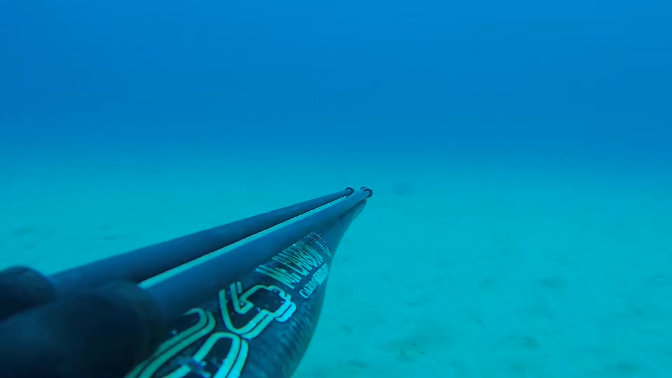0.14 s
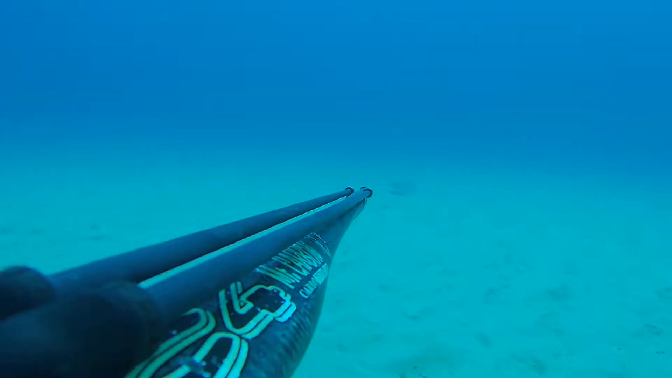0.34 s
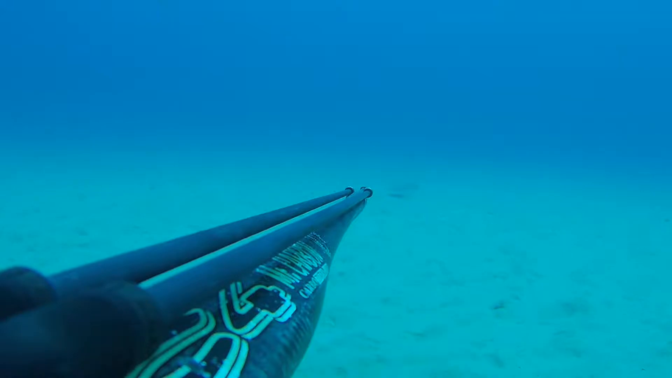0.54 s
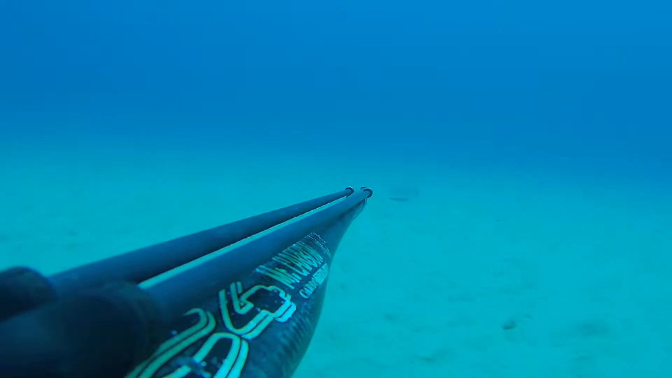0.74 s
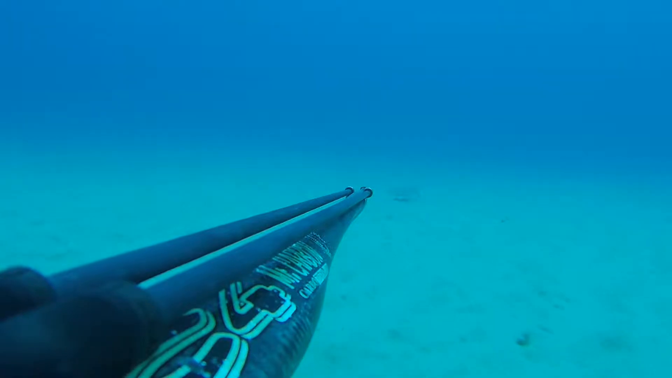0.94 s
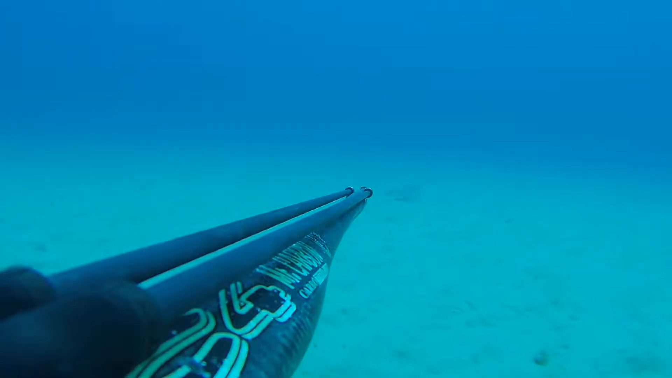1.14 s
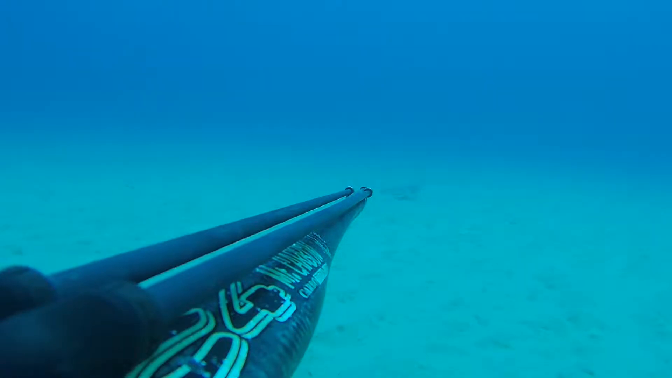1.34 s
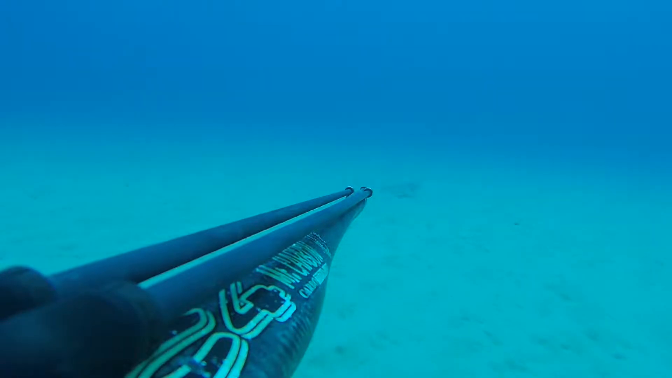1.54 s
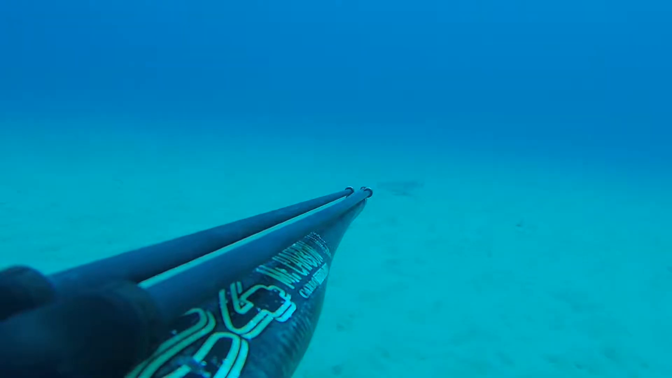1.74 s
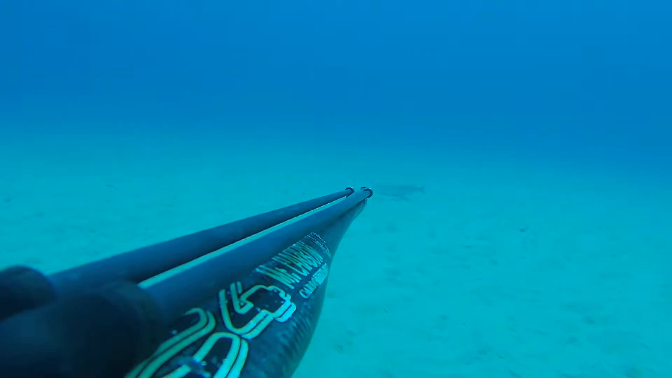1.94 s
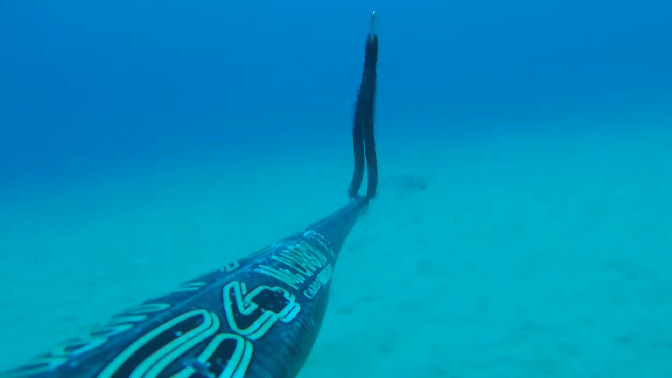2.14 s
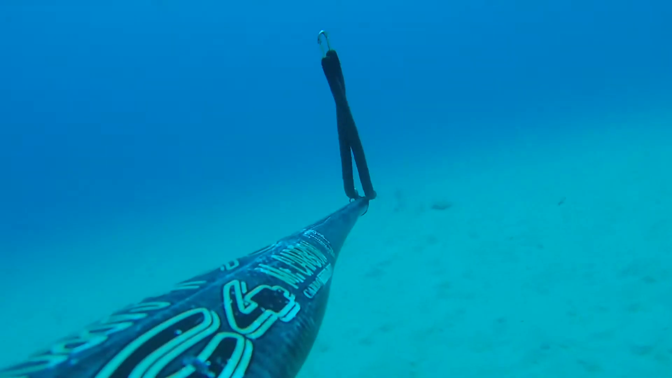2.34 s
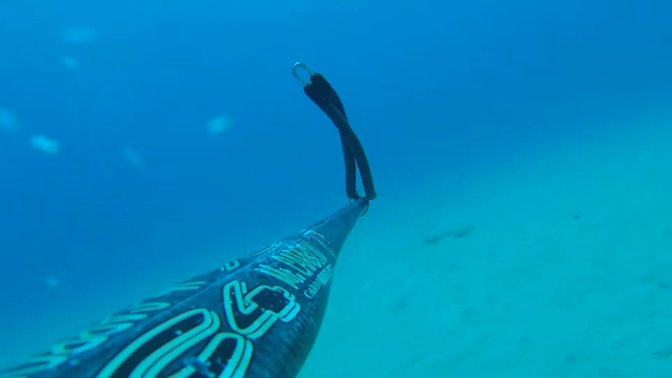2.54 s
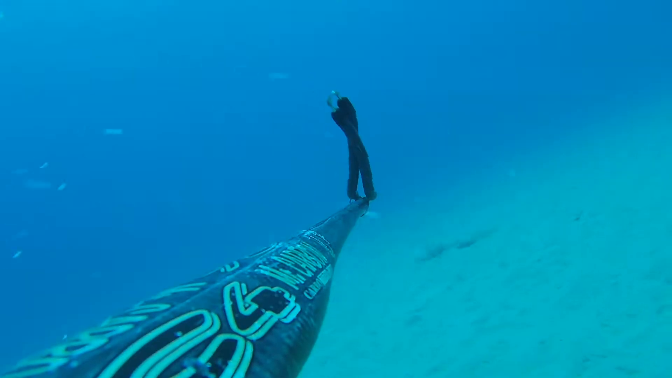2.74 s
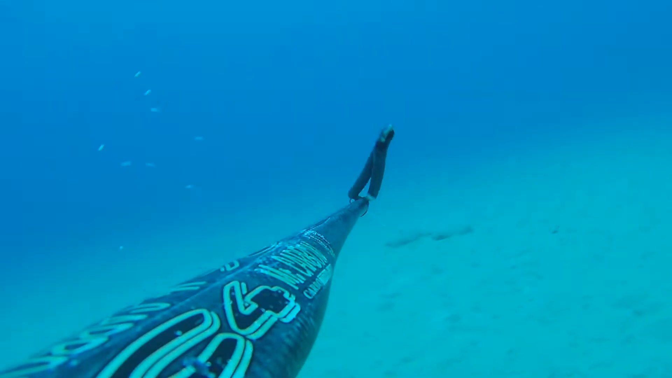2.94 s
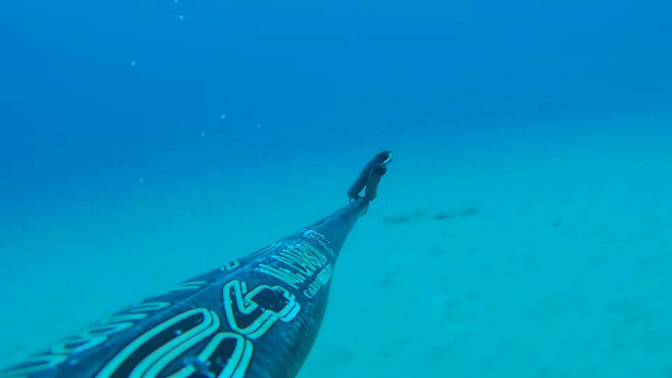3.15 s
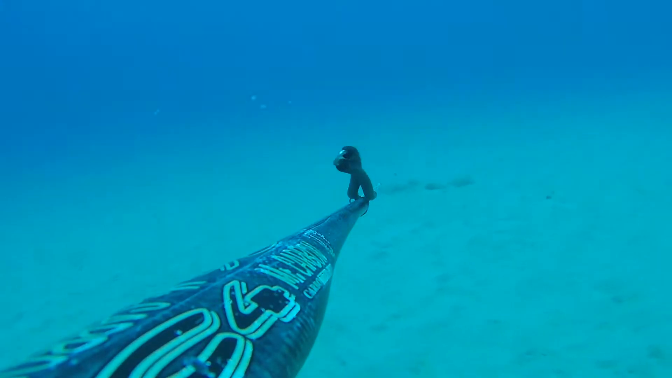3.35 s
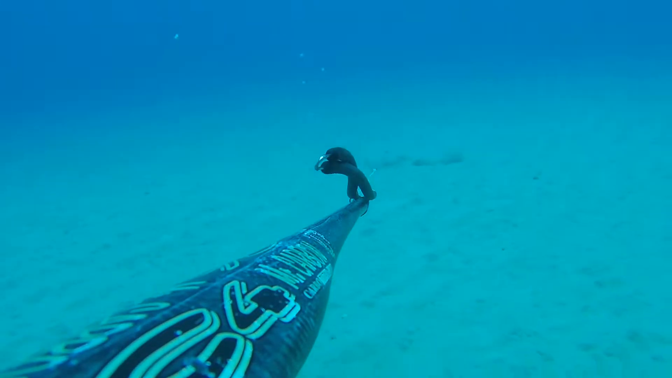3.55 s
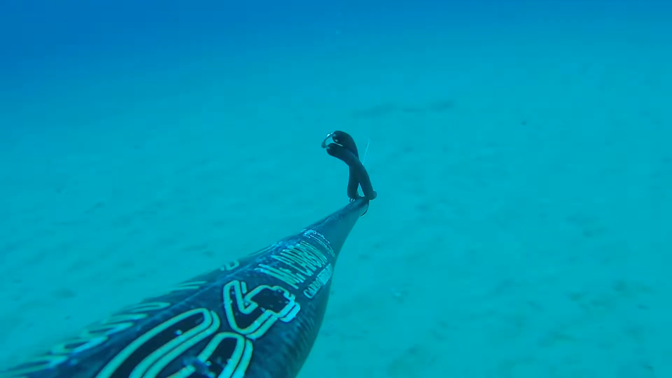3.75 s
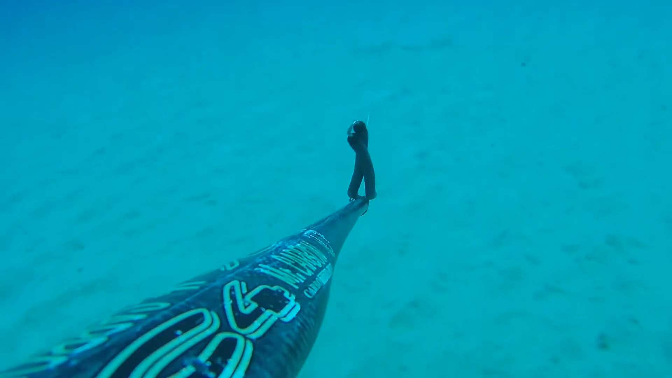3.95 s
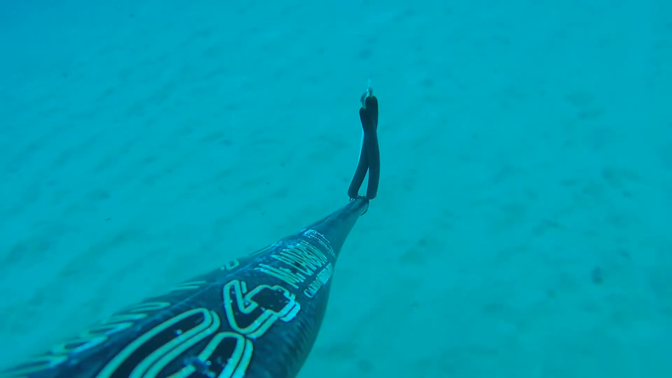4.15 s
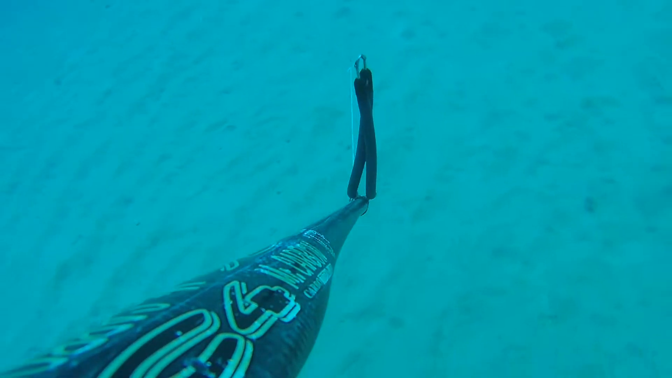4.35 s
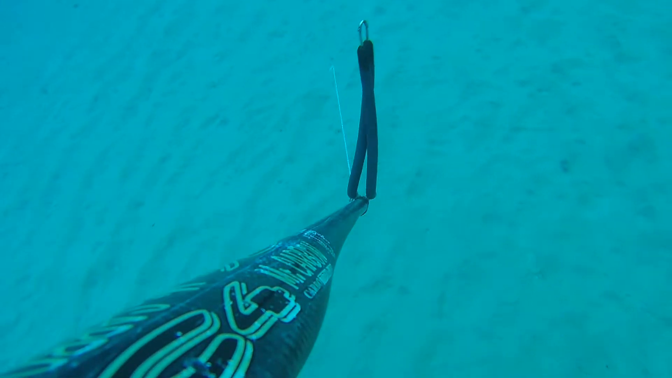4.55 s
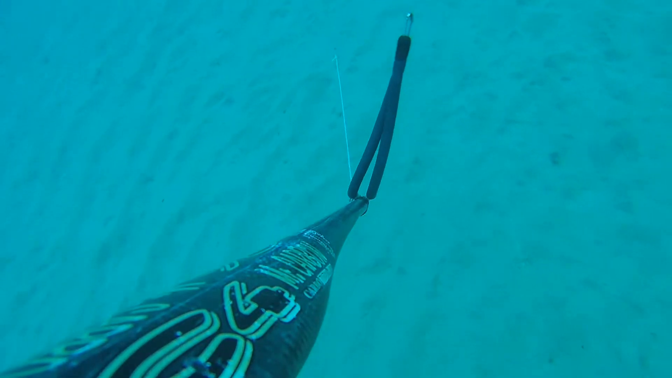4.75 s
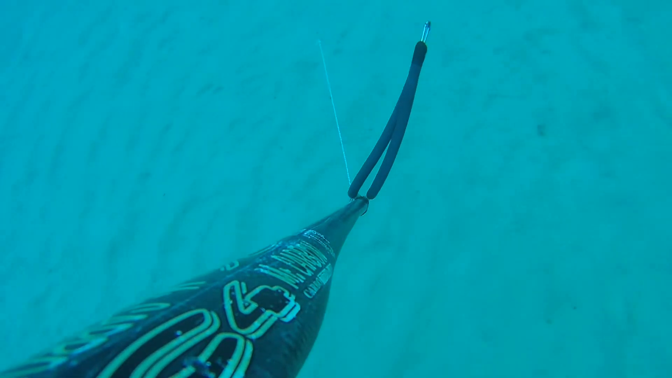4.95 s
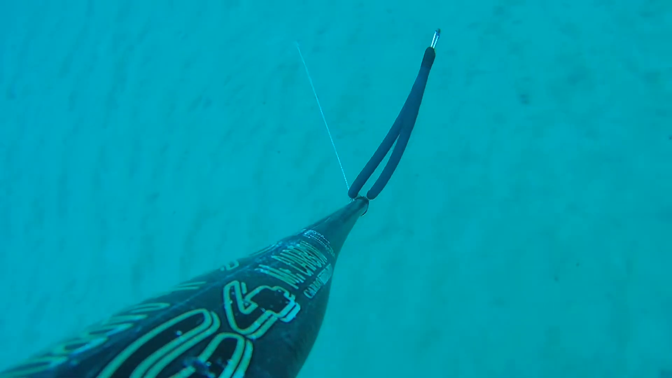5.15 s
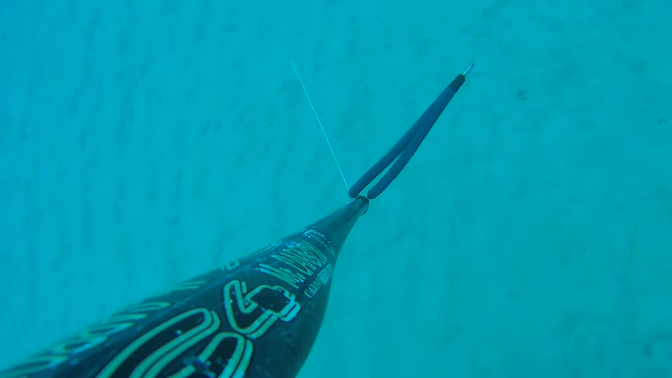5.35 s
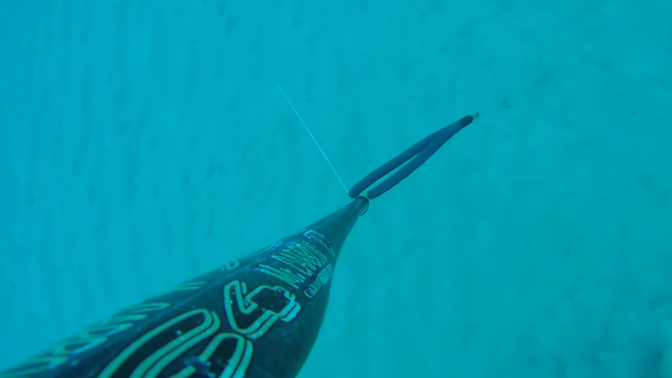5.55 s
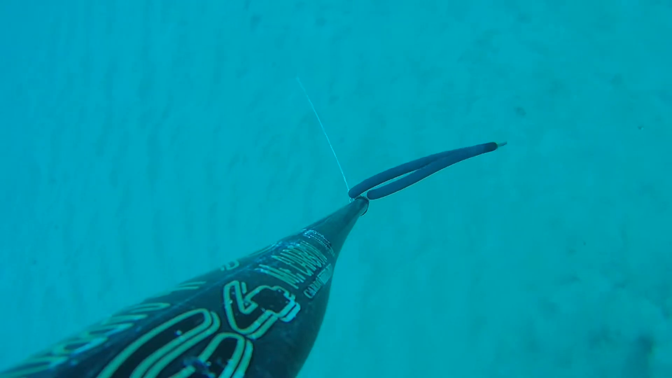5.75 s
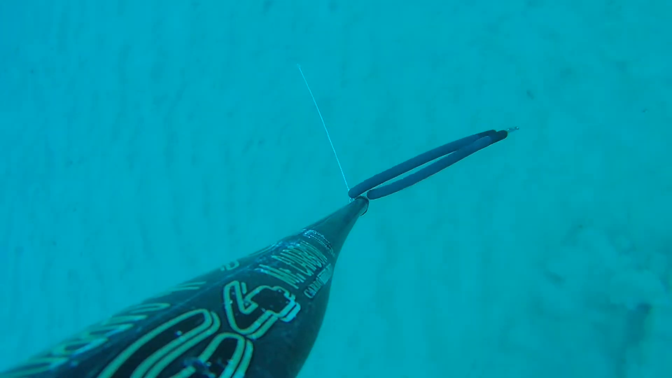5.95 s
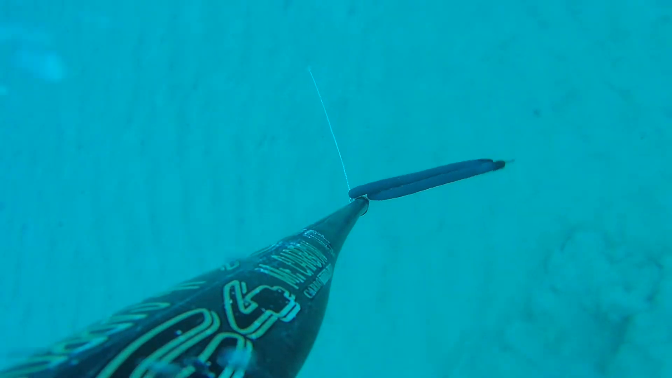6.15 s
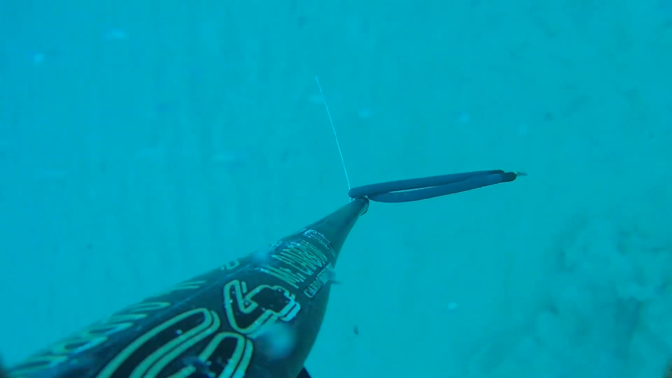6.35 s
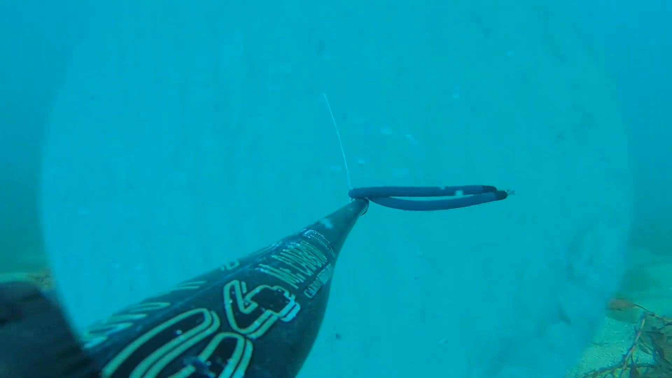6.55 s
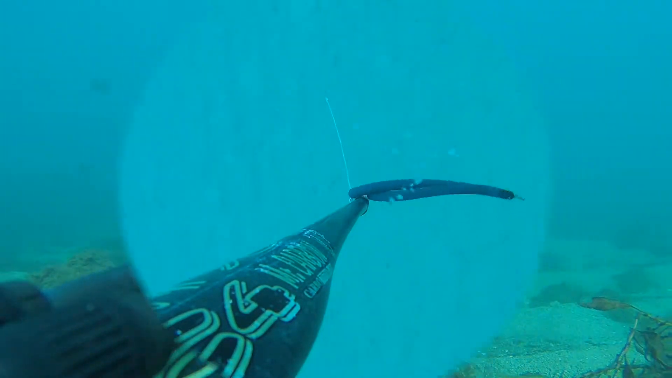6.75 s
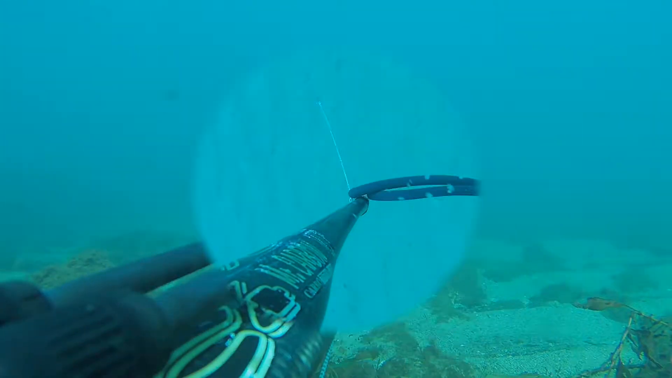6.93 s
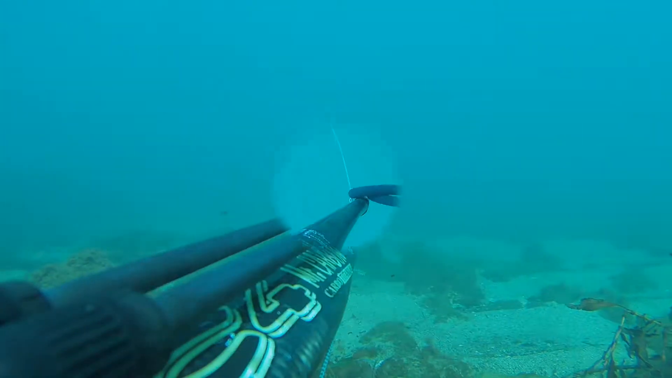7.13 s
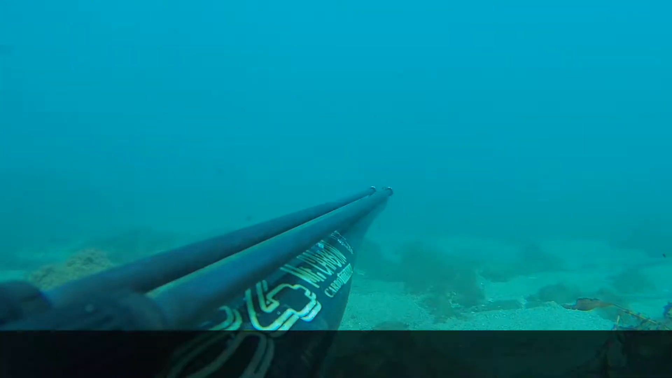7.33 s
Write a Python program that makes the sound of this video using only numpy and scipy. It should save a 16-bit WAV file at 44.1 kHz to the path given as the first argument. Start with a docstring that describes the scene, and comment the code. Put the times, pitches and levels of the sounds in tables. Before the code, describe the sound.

Beneath the sea, faint crackle and deep rumble are split by one distorted speargun blast; afterwards come slack rubber judders, water pushes, soft knocks and a bubble plop.

```python
"""Water rumbles past a housing fixed to an underwater rubber-band speargun; snapping shrimp crackle.
At 1.93 s it fires: decaying barrel modes, coloured-noise scrape, heave and whip, slap and clink bursts.
The recoil overloads the input and the gain ducks. Slack rubber then judders as wandering resonances;
bubbles ring, friction noise sings in the line, glided sines thrum, and one big bubble drops in pitch.
Flow and pushes of water shape coloured noise and gurgling bubble clouds."""
import sys
import numpy as np
from scipy import signal
from scipy.fft import rfft, irfft
from scipy.io import wavfile
from scipy.ndimage import uniform_filter1d, minimum_filter1d

SR = 44100
rng = np.random.default_rng(int(sys.argv[2]) if len(sys.argv) > 2 else 0)


def store_pcm(level_fs):
    """Save levels as 16-bit WAV."""
    pcm = np.round(np.clip(level_fs, -1, 1) * 32767).astype(np.int16)
    wavfile.write(sys.argv[1], SR, np.atleast_2d(pcm).T)


N = 325899
TIME = np.arange(N) / SR


def from_db(db):
    """Decibels to amplitude gain."""
    return 10 ** (np.asarray(db) / 20)


def rms_one(x):
    """Scale to unit power."""
    return x / np.sqrt(np.mean(x ** 2) + 1e-20)


def curve(rows):
    """Table points joined by straight lines in time."""
    return np.interp(TIME, *np.transpose(rows))


def swell(rows):
    """Gain from a dB curve, silent outside its span."""
    inside = (TIME >= rows[0][0]) & (TIME <= rows[-1][0])
    return from_db(curve(rows)) * uniform_filter1d(inside * 1., size=400)


def coloured(x, spectrum):
    """Minimum-phase filter of the given spectrum, sloping off beyond its ends; unit power gain."""
    size = 16384
    hz, db = np.transpose(spectrum)
    hz = np.r_[hz[0] / 1.25, hz, hz[-1] * 1.25]
    db = np.r_[db[0] - 20, db, db[-1] - 21]
    log_hz = np.log(np.maximum(np.fft.rfftfreq(size, 1 / SR), 1))
    cepstrum = irfft(np.log(from_db(np.interp(log_hz, np.log(hz), db))))
    # fold the cepstrum: causal, minimum phase
    cepstrum[1:size // 2] *= 2
    cepstrum[size // 2 + 1:] = 0
    response = irfft(np.exp(rfft(cepstrum)))[:size // 2]
    return signal.fftconvolve(x, response / np.linalg.norm(response))[:N]


def noise(spectrum):
    """Coloured noise of unit power."""
    return rms_one(coloured(rng.standard_normal(N), spectrum))


def evened(x, span_s):
    """Take out level swings slower than the span."""
    power = np.abs(uniform_filter1d(x ** 2, size=max(int(span_s * SR), 2)))
    return x / np.sqrt(power + 1e-9)


def drift(rate_hz):
    """Low-passed chance of unit rms."""
    lowpass = signal.butter(2, rate_hz, fs=SR, output="sos")
    return rms_one(signal.sosfilt(lowpass, rng.standard_normal(N)))


def phase_of(hz):
    """Running phase of a moving frequency."""
    return 2 * np.pi * np.cumsum(hz) / SR


def singing(hz, width_hz):
    """A moving resonance kept going by friction: narrow-band noise about hz."""
    phase = phase_of(hz)
    return rms_one(drift(width_hz / 2) * np.cos(phase) + drift(width_hz / 2) * np.sin(phase))


def clicks(times_s, sizes):
    """One impulse per event."""
    out = np.zeros(N)
    out[(np.asarray(times_s) * SR).astype(int)] = sizes
    return out + 1e-18


def fading(x, t60_s):
    """Each impulse starts an exponential decay."""
    return signal.lfilter([1], [1, -from_db(-60 / (t60_s * SR))], x)


def ring(x, hz, t60_s):
    """Two-pole resonator: a unit impulse starts a decaying sine of height 1."""
    r, w = from_db(-60 / (t60_s * SR)), 2 * np.pi * hz / SR
    return signal.lfilter([0, r * np.sin(w)], [1, -2 * r * np.cos(w), r * r], x)


def bursts(x, t60_s, tail_db, tail_t60_s):
    """Each impulse becomes a short noise crack with a fainter scattered tail."""
    envelope = fading(x, t60_s) + from_db(tail_db) * fading(x, tail_t60_s)
    return rng.choice([-1, 1], N) * envelope


def stroke(start_s, length_s, level_db, attack_s, release_s, slope_db_per_s=0):
    """Gain of one gesture: attack, level or sloping hold, release; attack and release in s per 20 dB."""
    since = TIME - start_s
    outside = np.maximum(-since, 0) / attack_s + np.maximum(since - length_s, 0) / release_s
    hold_db = level_db + slope_db_per_s * np.clip(since, 0, length_s)
    return from_db(hold_db - 20 * np.minimum(outside, 10))


def strokes(rows, attack_s, release_s, slope_db_per_s=0):
    """Strongest of several gestures of one shape; rows begin with start, length, level."""
    return np.max([stroke(*row[:3], attack_s, release_s, slope_db_per_s) for row in rows], axis=0)


def pitch_of(rows):
    """Pitch glides from mid-gesture to mid-gesture."""
    return curve([(s + length / 2, hz) for s, length, _, hz in rows])


def bubble_cloud(low_hz, high_hz, per_s, cycles):
    """Bubbles born at random ring at one of 16 pitches, -60 dB after the given cycles; unit power."""
    born = (rng.random(N) < per_s / SR) * rng.standard_normal(N)
    pitches_hz = np.geomspace(low_hz, high_hz, 16)
    dealt = rng.integers(0, len(pitches_hz), N)
    return rms_one(sum(ring(born * (dealt == k) + 1e-18, hz, cycles / hz)
                       for k, hz in enumerate(pitches_hz)))


# slow eddies on the housing, two runs before and after the shot [t/s, relative level/dB]
EDDIES = [
    [(0.02, -48), (0.212, -34), (0.232, -42), (0.658, -35.5), (1.294, -38), (1.428, -32.5), (1.556, -40.5),
     (1.8, -35.5)],
    [(2.55, -50.5), (2.68, -39.5), (4.97, -41), (5.26, -34), (5.37, -40), (5.45, -32.5), (6.19, -37.5),
     (7.3, -55)],
]
# spectra of eddies, buffeting, lower and upper rush, steady floor [f/Hz, relative density/dB per Hz]
EDDY_COLOUR = [(8, -11.5), (13, 0), (25, -2), (40, -3.5), (50, -15.5), (65, -17.5), (85, -33), (120, -41),
               (200, -59)]
BUFFET_COLOUR = [(35, -23.5), (60, 12.5), (80, 12), (105, -8.5), (140, -30), (250, -32.5)]
RUSH_LOW_COLOUR = [(60, -4), (110, -3), (150, -2.5), (225, -0.5), (300, -14.5), (400, -23.5), (600, -35.5)]
RUSH_HIGH_COLOUR = [(280, -14), (420, -8.5), (570, 11), (700, -0.5), (900, -9), (1400, -10), (2500, -28.5),
                    (4500, -18)]
FLOOR_COLOUR = [(40, 15), (100, -9.5), (220, -8), (330, -15), (600, -19.5), (1200, -23.5), (4000, -32),
                (14000, -32)]
# flow along the gun as it is swung round [t/s, level/dB]
FLOW = [(2.85, -69), (3.75, -71), (4.03, -49), (4.29, -45.5), (4.73, -51), (5.32, -52.5), (5.48, -42.5),
        (5.72, -47.5), (5.89, -44), (6.08, -49.5), (6.21, -48), (6.43, -47), (7.2, -63.5), (7.3, -83)]
# single pushes of water past the gun
# [t/s, length/s, rush level/dB, upper rush level/dB, buffeting level/dB]
SWISHES = [(2.635, 0.14, -64, -67, -34.5), (2.822, 0.36, -64.5, -69, -52), (3.05, .07, -66, -61, -55),
           (3.38, 0.1, -57.5, -70, -41.5), (3.805, 0.042, -46.5, -52.5, -61),
           (4.078, 0.42, -54.5, -59, -58), (5.4, 0.013, -41, -70, -34.5), (5.767, 0.12, -43.5, -63, -34),
           (5.944, 0.026, -36.5, -64, -30), (6.068, 0.0066, -48, -51.5, -58),
           (6.152, .12, -36.5, -52.5, -32), (6.495, 0.023, -44, -58.5, -32)]


def water(upper_follows=0.83, buffet_follows=0.76, gurgle_db=-3):
    """Eddies press on the housing; flow and pushes add buffeting, fluttering rush and gurgles."""
    eddies = from_db(3.5 + curve(np.vstack(EDDIES))) * evened(noise(EDDY_COLOUR), span_s=0.16)
    flow = swell(FLOW)
    s, length_s, *levels_db = np.transpose(SWISHES)
    push, upper_push, buffet_push = [
        strokes(zip(s, length_s, db), attack_s=0.035, release_s=0.049) for db in levels_db]
    low = (flow + push) * evened(noise(RUSH_LOW_COLOUR), span_s=0.1)
    rush = from_db(-3.5) * noise(RUSH_HIGH_COLOUR) * from_db(1.7 * drift(33))
    gurgle = from_db(gurgle_db) * bubble_cloud(low_hz=314, high_hz=957, per_s=410, cycles=9.9)
    high = (from_db(-26.5) * flow ** upper_follows + upper_push) * (rush + gurgle)
    buffet_gain = from_db(-5) * flow ** buffet_follows + buffet_push
    buffet = buffet_gain * evened(noise(BUFFET_COLOUR), span_s=0.21)
    return eddies + buffet + low + high + from_db(-52.5) * noise(FLOOR_COLOUR)


# hiss of far shrimp, two runs before and after the shot [t/s, relative level/dB]
CRACKLE = [
    [(0.05, -58.5), (0.224, -57.5), (0.636, -57), (0.716, -56), (1.116, -55), (1.302, -57.5), (1.85, -55)],
    [(3.0, -55.5), (3.29, -52), (3.79, -55), (4.33, -53.5), (6.58, -55.5), (7.01, -59.5), (7.3, -60)],
]
# what the housing lets through [f/Hz, relative density/dB per Hz]
HOUSING = [(1500, -20), (2200, -17.5), (3000, -17.5), (4300, -25.5), (4750, -8.5), (5200, -1), (5750, 1),
           (6900, -8), (7700, -3), (8700, -2.5), (9600, -12.5), (10800, -32.5), (12500, -16),
           (14000, -20.5)]


def far_shrimp(per_s=260, spread_db=6.0, wash_db=-5.0, snaps_db=0.5, patchy_db=1.74):
    """Countless far snaps merge to a hiss; nearer ones are grains; the level drifts in flurries."""
    sizes = from_db(spread_db * np.minimum(rng.exponential(1, N), 3.6))
    impulses = sizes * (rng.random(N) < per_s / SR) + 1e-18
    snaps = bursts(impulses, t60_s=0.0056, tail_db=-10, tail_t60_s=0.043)
    sea = from_db(wash_db) * rng.standard_normal(N) + from_db(snaps_db) * rms_one(snaps)
    level_db = curve(np.vstack(CRACKLE)) + patchy_db * drift(12.2)
    return from_db(level_db) * coloured(sea, HOUSING)


# near shrimp [t/s, relative strength/dB, low ring re strength/dB, top ring re strength/dB]
SNAPS = [(0.093, -38.5, -10.5, 4.5), (0.2074, -41, -13, 7), (0.3105, -45.5, -3.5, 10.5),
         (0.3901, -37, -14, 1), (0.4923, -39.5, -22, -16), (0.6266, -42, -27, -7), (0.774, -43, -22, 12),
         (0.906, -43, -30, -15), (1.0392, -41, -11, -16), (1.2238, -32, -29, -20), (1.296, -41, -28, -2),
         (1.4304, -38, -11.5, 2.5), (1.6093, -43, -6.5, 6), (1.6576, -50.5, -13, 18.5),
         (1.7786, -41, -30, 1), (3.0285, -49.5, -18, 15.5), (3.1095, -46, -15, 11.5),
         (3.4168, -32, -16, -9), (3.4381, -45, -17, -12), (3.5252, -42, -14, -4), (3.5764, -49.5, -22, 6),
         (3.7379, -36, -27, -3), (4.0183, -33, -22, -4), (4.128, -55.5, 3, 15), (4.5503, -38.5, -29, 7),
         (4.7791, -45.5, -4, -18), (5.1941, -51, 6, 21), (5.3028, -34, -24, -24), (5.464, -55, 2, 13),
         (6.0654, -42.5, 7, -4), (6.2398, -52.5, -14, 21.5), (6.277, -34, -28, 2.5),
         (6.4507, -29.5, -30, -13), (6.518, -49, 1, -13), (6.7, -51, 1.5, -11), (7.3107, -51.5, 3, 8)]
# housing bands; the first two take the low ring, the last the top ring [low f/Hz, high f/Hz, relative gain/dB]
SNAP_BANDS = [(1820, 2540, 3.5), (3750, 6700, 8.5), (5090, 5700, 6), (7100, 9000, 0)]


def near_shrimp():
    """Single snaps ring the housing bands, each in its own balance of low and top."""
    s, strength_db, low_db, top_db = np.transpose(SNAPS)
    out = 0
    shares_db = (low_db - 1, low_db - 1, 0, top_db)
    for share_db, (low_hz, high_hz, gain_db) in zip(shares_db, SNAP_BANDS):
        impulses = clicks(s, from_db(strength_db + share_db + gain_db - 5.5))
        crack = bursts(impulses, t60_s=0.0081, tail_db=-15, tail_t60_s=0.073)
        band = signal.butter(2, [low_hz, high_hz], "band", fs=SR, output="sos")
        out = out + signal.sosfilt(band, crack) * np.sqrt(SR / 2 / abs(high_hz - low_hz))
    return out


# bands and line striking the barrel [t/s, relative strength/dB, hardness/dB per octave]
KNOCKS = [(1.932, 3.5, -1), (1.946, 12.5, 2.5), (1.971, 13, 10.5), (1.986, 10.5, -3), (2.075, 8.5, 7),
          (2.084, 1.5, 6.5), (2.11, -23, 14), (2.13, -6, 0), (2.166, -5.5, 1), (2.18, -19, 12.5),
          (2.189, -3.5, -0.5), (2.208, -15.5, -2), (2.275, -5, 0), (2.283, -15.5, 4.5), (3.398, -45.5, 8),
          (3.801, -47, -1), (5.392, -24.5, 4.5), (5.4, -27, 4), (5.75, -28.5, 1.5), (5.812, -40, 3.5),
          (5.826, -26, 2.5), (5.839, -31.5, -9), (5.934, -29.5, 2), (5.968, -36, 8.5), (6.066, -41, 3),
          (6.12, -23.5, -5.5), (6.163, -23.5, -3), (6.243, -27.5, -4), (6.478, -33, 3),
          (6.513, -26.5, -8.5), (6.529, -25, -2.5), (6.641, -34, -1)]
# barrel modes in water [f/Hz, relative level/dB, t60/s]
BARREL = [(56, 1, 0.13), (142.4, -5, 0.094), (195.2, -1.5, 0.08), (227, -8.5, 0.053), (300, -15, 0.042),
          (374, -18.5, 0.041), (444, -35, 0.024), (490, -19.5, 0.065), (685, -34, 0.031),
          (940, -33.5, 0.016), (1180, -30, 0.0065), (1700, -31.5, 0.0055), (2400, -37.5, 0.0044)]


def knocks(contact_hz=900, pivot_hz=200):
    """Each blow rings the water-damped barrel; harder ones favour upper modes; contact low-passes all."""
    s, level_db, hardness = np.transpose(KNOCKS)
    chance_db = rng.normal(0, 3.47, (len(s), len(BARREL)))
    body = 0
    for k, (hz, mode_db, t60_s) in enumerate(BARREL):
        tilt_db = hardness * np.log2(hz / pivot_hz)
        strength = from_db(level_db + mode_db + tilt_db + chance_db[:, k])
        polarity = (-1) ** (k // 2)
        body = body + ring(clicks(s, strength), hz, t60_s) * polarity
    return signal.sosfilt(signal.butter(2, contact_hz, fs=SR, output="sos"), body)


# water heaved by the shot [f/Hz, relative density/dB per Hz]
HEAVE_COLOUR = [(12, -15.5), (24, -5), (42, 4), (60, -8), (85, -20.5), (170, -26.5), (300, -44.5),
                (700, -57), (2000, -85)]


def heave(shot_s=1.933, driven_s=0.043, level_db=4):
    """The shot drives the water: low noise with a fast attack and slow release."""
    gain = stroke(shot_s, driven_s, level_db, attack_s=0.0038, release_s=0.33)
    return gain * evened(noise(HEAVE_COLOUR), span_s=0.021)


# spear scraping down the track [t/s, length/s, level at start/dB]
SCRAPE = [(1.935, 0.021, 1.5), (1.97, .019, 1.5)]
# [f/Hz, relative density/dB per Hz]
SCRAPE_COLOUR = [(70, -2.5), (140, 11), (250, 13.5), (400, 6.5), (600, 0), (1200, 1), (3000, -16.5),
                 (5500, -8), (8000, -4.5), (11000, -21.5), (15000, -19.5)]


def scrape():
    """The spear scrapes out of the track: rising noise, roughened at random."""
    gain = strokes(SCRAPE, attack_s=0.0044, release_s=0.0044, slope_db_per_s=483)
    return gain * noise(SCRAPE_COLOUR) * from_db(8.2 * drift(243))


# kicks as the spear leaves, the bands land and the hand catches the gun [t/s, length/s, level/dB]
RECOIL = [(1.966, .02, 4), (2.014, .057, 23.5), (2.087, .008, -3.5)]


def recoil(push=0.61):
    """The gun is thrown back and shudders; pressure on the housing far exceeds the input's range."""
    shudder = np.sin(2 * np.pi * 31.3 * (TIME - 1.9185))
    return strokes(RECOIL, attack_s=0.028, release_s=0.011) * (push + shudder)


# whipping line, also slapping bands [f/Hz, relative density/dB per Hz]
WHIP_COLOUR = [(120, 0), (250, 0.5), (500, -4), (900, -6), (1500, -18.5), (2500, -30), (4000, -41),
               (8000, -38.5), (14000, -65)]


def whip(start_s=1.99, length_s=0.26, first_db=-16, fade_db_per_s=117.5):
    """Line whips out behind the spear: rough noise fading as the spear slows."""
    gain = stroke(start_s, length_s, first_db, attack_s=0.005, release_s=0.025,
                  slope_db_per_s=-fade_db_per_s)
    return gain * noise(WHIP_COLOUR) * from_db(5.8 * drift(111))


# bands slapping the muzzle [t/s, impulse level/dB]
SLAPS = [(1.9988, 17), (2.0026, 25), (2.0128, 31), (2.036, 11), (2.042, 4.5), (2.079, 6.5), (2.115, -10),
         (2.165, -6), (2.19, -10.5), (2.206, -10), (2.213, -18), (2.279, -15.5), (2.294, -24)]


def slaps():
    """Bands slap the muzzle: short coloured cracks."""
    s, level_db = np.transpose(SLAPS)
    cracks = bursts(clicks(s, from_db(level_db)), t60_s=0.0055, tail_db=-31, tail_t60_s=0.03)
    return coloured(cracks, WHIP_COLOUR)


# steel wishbone clinking [t/s, impulse level/dB]
CLINKS = [(2.0199, 35.5), (2.079, 6), (2.11, -21), (2.141, -2.5)]


def clinks():
    """The steel wishbone clinks: short cracks through the housing."""
    s, level_db = np.transpose(CLINKS)
    cracks = bursts(clicks(s, from_db(level_db)), t60_s=0.0036, tail_db=-29.5, tail_t60_s=0.023)
    return coloured(cracks, HOUSING)


# slack rubber rubbing [t/s, length/s, relative level/dB, main resonance f/Hz]
RUB = [(2.407, 0.04, -31, 717), (2.458, 0.021, -38, 656.6), (2.505, 0.043, -41, 636),
       (2.578, 0.01, -31.5, 680), (2.607, 0.023, -25, 605), (2.675, 0.0048, -33, 640),
       (2.711, 0.03, -27.5, 641)]
# rubber resonances [offset from main resonance/Hz, width/Hz, relative level/dB]
RUB_MODES = [(-375, 59, 1), (2, 54, -0.5), (441.5, 230, -20)]


def rubber():
    """Slack bands rub on each other in short judders: friction-driven resonances plus grit."""
    hz = pitch_of(RUB)
    modes = sum(from_db(db) * evened(singing(hz + apart_hz, width_hz), span_s=0.019)
                for apart_hz, width_hz, db in RUB_MODES)
    grit = noise([(120, 1.5), (280, -8.5), (450, 7), (680, 10), (1150, -15.5), (1600, -25), (3000, -39)])
    gain = strokes(RUB, attack_s=0.02, release_s=0.017)
    return gain * (from_db(-4.0) * modes + from_db(-11.0) * grit)


# larger bubbles [t/s, level/dB, f/Hz, t60/s]
BUBBLES = [(2.562, -49.5, 1507, 0.046), (2.91, -60, 1450, 0.12), (2.975, -55.5, 1470, 0.14),
           (3.107, -52.5, 1377, 0.085), (4.135, -56, 1500, 0.11), (5.611, -52, 1107, 0.099),
           (6.17, -47, 2060, 0.073), (6.236, -46, 1352, 0.07), (6.304, -51.5, 1460, 0.11),
           (6.42, -54, 1680, 0.051), (6.453, -42.5, 1160, 0.014)]
# clouds of tiny bubbles [t/s, length/s, level/dB]
FIZZ = [(2.9, .04, -65.5), (3.035, .045, -61.5), (3.14, 0.08, -68.5), (4.15, 0.37, -70), (6.12, 0.096, -62),
        (6.32, 0.28, -69), (6.815, 0.0071, -72)]


def bubbles():
    """A few larger bubbles ring at their own pitch among clouds of tiny ones."""
    large = sum(ring(clicks([s], from_db(db)), hz, t60_s) for s, db, hz, t60_s in BUBBLES)
    tiny = bubble_cloud(low_hz=1190, high_hz=2820, per_s=350, cycles=28)
    return large + strokes(FIZZ, attack_s=0.069, release_s=0.096) * tiny


# line sliding through the muzzle [t/s, length/s, relative level/dB, f/Hz]
SLIDE = [(4.13, 0.39, -70, 1300), (4.657, 0.0049, -54, 1183), (4.71, 0.12, -63.5, 1260),
         (4.89, 0.039, -62.5, 1106), (4.99, 0.121, -60, 1140), (5.215, 0.087, -52, 1212),
         (5.605, 0.014, -71, 1096), (5.765, 0.086, -56.5, 1198)]


def line_slide():
    """The line sings and rasps faintly through the muzzle: friction resonance plus noise."""
    song = singing(pitch_of(SLIDE), width_hz=157)
    friction = from_db(-2.5) * song + from_db(-1.5) * noise(RUSH_HIGH_COLOUR)
    return strokes(SLIDE, attack_s=0.018, release_s=0.055) * friction * from_db(2.7 * drift(26))


# tugs that set the taut line thrumming in the flow [t/s, length/s, relative level/dB, f/Hz]
THRUM = [(5.46, .14, -22.5, 51.56), (5.72, 0.075, -29.5, 54.84), (5.98, 0.089, -27, 55.67),
         (6.165, 0.072, -21, 56.13), (6.33, .1, -24, 57.14), (6.515, 0.029, -28.5, 56.15),
         (6.65, .03, -29.5, 53.6), (6.79, 0.076, -34.5, 54.2), (7.03, 0.077, -42.5, 56.6)]


def line_thrum():
    """The taut line thrums: a low sine gliding in pitch from tug to tug."""
    tone = np.sqrt(2) * np.sin(phase_of(pitch_of(THRUM)))
    return from_db(0.5) * strokes(THRUM, attack_s=0.17, release_s=0.08) * tone


def plop(start_s=6.816, level_db=-42.5, first_hz=1180, last_hz=900, settle_s=0.0025):
    """A big bubble breaks free; its pitch drops exponentially as it fills out."""
    hz = last_hz + (first_hz - last_hz) * np.exp(-np.maximum(TIME - start_s, 0) / settle_s)
    gain = stroke(start_s, 0.0074, level_db, attack_s=0.0033, release_s=0.02)
    return gain * np.sin(phase_of(hz))


def scene():
    """Sum of sea and gun at one microphone."""
    sea = water() + far_shrimp() + near_shrimp() + bubbles() + plop()
    shot = heave() + scrape() + recoil() + whip() + slaps() + clinks()
    gun = knocks() + shot + rubber() + line_slide() + line_thrum()
    return (sea + gun)[None]


def gain_control(x, threshold_db=-11, most_db=16, hold_s=0.15, release_db_per_s=29, attack_s=0.019):
    """Loud sound turns the gain down; the cut is held, then creeps back."""
    over_db = np.clip(20 * np.log10(np.abs(x) + 1e-9) - threshold_db, 0, most_db)
    half = int(hold_s * SR / 2)
    # running maximum over the past hold_s
    held_db = -minimum_filter1d(-over_db, size=2 * half + 1, origin=half)
    ramp_db = release_db_per_s * TIME
    cut_db = np.maximum.accumulate(held_db + ramp_db) - ramp_db
    pole = np.exp(-1 / (attack_s * SR))
    return x * from_db(-signal.lfilter([1 - pole], [1, -pole], cut_db))


def record(dry, ceiling=0.27, offset=-0.019, cutoff_hz=14200):
    """DC offset, gain control too slow for the shot, hard overload, steep top cut."""
    x = gain_control(dry[0] + offset)
    x = x / (1 + (x / ceiling) ** 8) ** (1 / 8)
    top_cut = signal.ellip(10, 0.2, 80, cutoff_hz, fs=SR, output="sos")
    return signal.sosfilt(top_cut, x)[None]


dry = scene()
out = record(dry)
store_pcm(out)
```